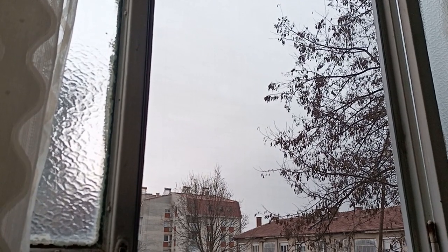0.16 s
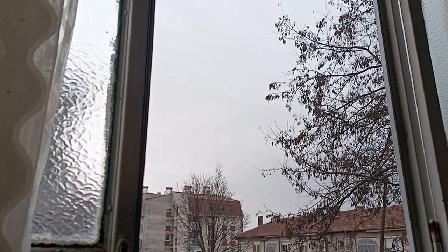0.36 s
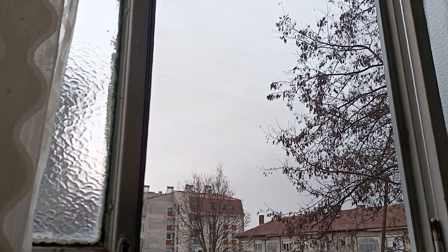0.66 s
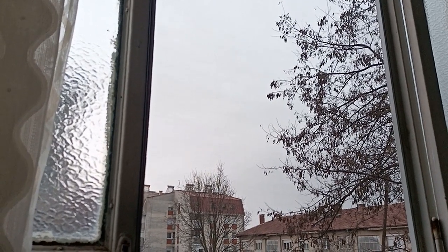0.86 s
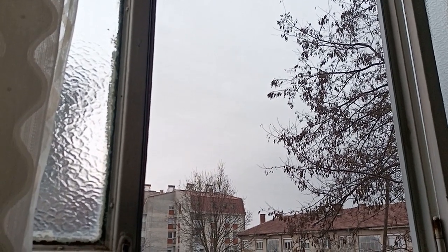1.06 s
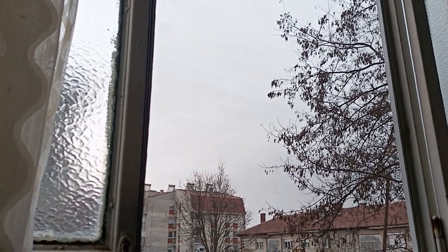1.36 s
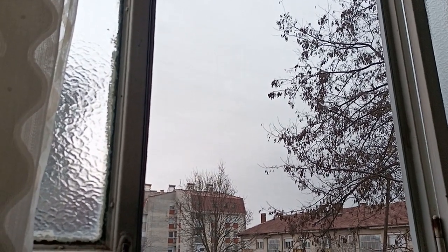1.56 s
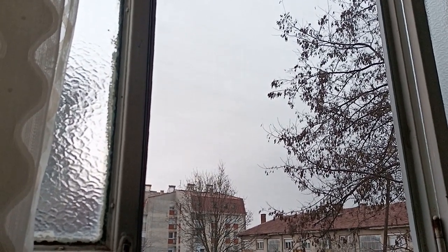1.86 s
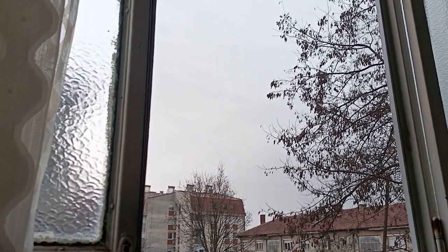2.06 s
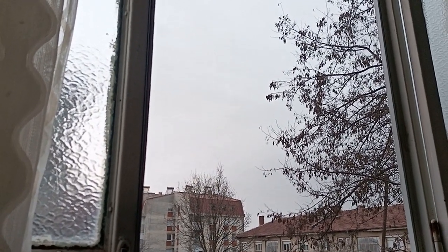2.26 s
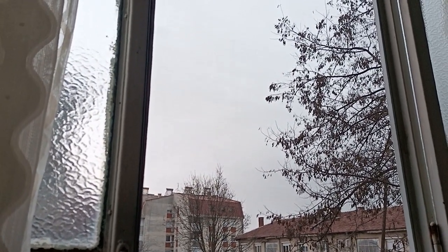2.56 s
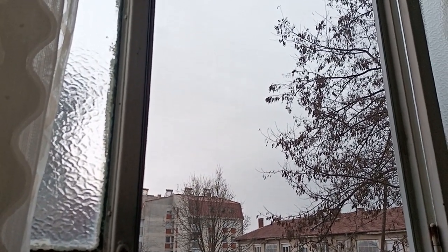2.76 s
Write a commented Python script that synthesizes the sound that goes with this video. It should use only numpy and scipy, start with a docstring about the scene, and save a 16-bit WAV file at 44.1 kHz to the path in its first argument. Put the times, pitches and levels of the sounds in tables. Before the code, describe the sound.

Distant thunder rolls in a low, uneven rumble, strongest in the first half, then fades. Light rain hisses and drops tick on the sill; one faint bird call falls late. Heard from indoors at an open window.

```python
"""Far thunder and light rain at an open window

Far thunder rolls, swells and fades in a room: dense shock clicks, dulled by distance, boom at the room's modes.
Light rain is coloured noise with a patter of small drops; larger drops tick and splash on the sill as
short noise bursts. A small bird gives one falling call, a breathy whistle under a fainter, higher one."""
import sys
import numpy as np
from scipy import signal
from scipy.fft import rfft, irfft
from scipy.io import wavfile
from scipy.ndimage import uniform_filter1d

SR = 44100
rng = np.random.default_rng(int(sys.argv[2]) if len(sys.argv) > 2 else 0)


def log_audio(samples):
    """Write samples as a 16-bit WAV file to the path given in sys.argv[1]."""
    # one column per channel
    frames = np.atleast_2d(samples).T
    # limit to full scale, then quantise
    limited = np.clip(frames, -1, 1)
    pcm = np.round(limited * 32767).astype(np.int16)
    wavfile.write(sys.argv[1], SR, pcm)


N = 127890


def amp(db):
    """Turn decibels into a linear gain."""
    return 10 ** (np.asarray(db) / 20)


def rms_one(x):
    """Bring a sound to an RMS level of 1."""
    return x / np.sqrt(np.mean(x ** 2) + 1e-20)


def in_time(rows):
    """Draw each column of a table as a curve of straight lines over its first column, the time [s]."""
    s, *columns = np.transpose(rows)
    return [np.interp(np.arange(N) / SR, s, column) for column in columns]


def coloured(x, points):
    """Shape the spectrum of x by a table of (frequency [Hz], level [dB])."""
    hz, db = np.transpose(points)
    f = np.maximum(np.fft.rfftfreq(len(x), 1 / SR), 1)
    gain_db = np.interp(np.log(f), np.log(hz), db, left=-80, right=-80)
    return irfft(rfft(x) * amp(gain_db), len(x))


def band(x, low_hz, high_hz):
    """Keep one band of a sound, with gentle edges."""
    sos = signal.butter(2, [low_hz, min(high_hz, .45 * SR)], "band", fs=SR, output="sos")
    return signal.sosfilt(sos, x)


def drift(rate_hz):
    """Smooth random wandering with RMS 1: white noise through two equal one-pole lowpasses."""
    r = np.exp(-2 * np.pi * rate_hz / SR)
    noise = rng.standard_normal(N + SR)
    return rms_one(signal.lfilter([1], [1, -2 * r, r * r], noise)[SR:])  # skip the filter's start


def clicks(per_s, spread_db):
    """Random clicks of uneven size and sign."""
    sizes = amp(spread_db * np.minimum(rng.exponential(1, N), 5)) * rng.choice([-1, 1], N)
    return sizes * (rng.random(N) < per_s / SR)


def swell(s, length_s):
    """A bell-shaped rise and fall around the time s."""
    return np.exp(-.5 * ((np.arange(N) / SR - s) / (.4 * length_s)) ** 2)


# The slow course of the roll: (time [s], level of the body 110-400 Hz [dB], boom below 110 Hz
# [dB re body], growl 400-900 Hz [dB re body], rasp 900-1190 Hz [dB re body])
ROLL = [(0, -42.5, -15.5, -4, -10.5), (.26, -43.5, -9.5, -9, -18.5), (.45, -40.5, -11, -5.5, -15.5),
        (.72, -38, -9, -6.5, -19), (1.05, -38.5, -7, -4.5, -15), (1.45, -37.5, -14.5, -10, -18.5),
        (1.75, -42, -5.5, -5.5, -18.5), (2.05, -49, -5.5, -12.5, -23), (2.4, -45, -15.5, -7, -21),
        (2.62, -55, -11, -11, -21), (2.76, -51.5, 5, -10.5, -18.5), (2.9, -48, -13, -18.5, -26)]
# Borders between the registers boom, body, growl, rasp and top: (frequency [Hz])
REGISTER_EDGES_HZ = [110, 400, 900, 1190]
# Colour left after the long path through air, shaping each register inside: (frequency [Hz], level [dB])
THUNDER_COLOUR = [(20, -30), (45, -26.5), (65, -9.5), (103, -11), (142, 0), (330, -3.5), (560, -6.5),
                  (750, -14.5), (1140, -32.5), (1230, -31), (1590, -38.5), (1800, -57), (2600, -62)]
# Modes of the room: (frequency [Hz], lift [dB])
ROOM_MODES = [(73, 16), (145, 8), (195, 4.5), (233, 8.5), (325, 9), (410, 8.5), (556, 8.5), (655, 8.5),
              (883, 9.5), (1091, 9.5)]
# Short swells and dips of the roll: (middle time [s], length [s], change of the body [dB],
# change of growl, rasp and top [dB])
SWELLS_AND_DIPS = [(0.122, 0.084, 3, 3), (0.364, 0.084, 3, 0.5), (0.587, 0.031, 5.5, 5.5),
                   (0.879, 0.11, 3.5, 5.5), (0.97, 0.044, 8.5, 6), (1.147, 0.15, 3.5, 3),
                   (1.361, 0.056, 3.5, 2), (1.521, 0.058, 7, 6), (1.668, 0.067, 9, 8),
                   (1.79, 0.021, 9.5, -3), (1.897, 0.14, 4, 3), (2.105, 0.072, 1.5, 5),
                   (2.247, 0.056, 0, -6), (2.332, 0.042, 3, 2), (2.827, 0.05, 5.5, 8)]
# Chance wavering of the noise around the lowest room mode: (peak time [s], lift [dB])
LOW_WAVER = [(1.17, 9), (1.29, 9.5), (1.7, 11), (2.26, 9.5)]
LOW_WAVER_LENGTH_S = 0.055
SHOCKS_PER_S, SHOCK_SPREAD_DB = 2500, 2  # shock waves from the bends of the lightning channel
MODE_WIDTH_HZ, MODE_WIDENS = 5.1, 0.0089  # mode width = this plus a share of its pitch
# The top, above 1190 Hz, in dB re rasp: it dies faster as the rasp sinks under TOP_AT_DB
TOP_DB, TOP_FOLLOWS, TOP_AT_DB = -10, 0.53, -55


def thunder():
    """Crowded shock waves, dulled by distance, lifted at the room modes; the registers move in level."""
    f = np.fft.rfftfreq(N, 1 / SR)
    room_db = 0
    for hz, lift_db in ROOM_MODES:
        width_hz = MODE_WIDTH_HZ + MODE_WIDENS * hz
        room_db = room_db + lift_db / (1 + (2 * (f - hz) / width_hz) ** 2)
    shocks = coloured(clicks(SHOCKS_PER_S, SHOCK_SPREAD_DB), THUNDER_COLOUR)
    heard = rfft(shocks) * amp(room_db)

    body_db, boom_db, growl_db, rasp_db = in_time(ROLL)
    low_db = sum(db * swell(s, length) for s, length, db, _ in SWELLS_AND_DIPS)
    high_db = sum(db * swell(s, length) for s, length, _, db in SWELLS_AND_DIPS)
    waver_db = sum(db * swell(s, LOW_WAVER_LENGTH_S) for s, db in LOW_WAVER)
    top_db = rasp_db + TOP_DB + TOP_FOLLOWS * (body_db + rasp_db - TOP_AT_DB)
    registers_db = [boom_db + waver_db, low_db, growl_db + high_db, rasp_db + high_db, top_db + high_db]

    # lowpass curves whose differences cut out the registers
    below = [0 * f] + [1 / (1 + (f / hz) ** 12) for hz in REGISTER_EDGES_HZ] + [0 * f + 1]
    out = 0
    for k, db in enumerate(registers_db):
        part = irfft(heard * (below[k + 1] - below[k]), N)
        # even out the register's own slow loudness, so that the curves set it
        power = uniform_filter1d(uniform_filter1d(part ** 2, size=4500), size=4500)
        out = out + amp(body_db + db) * part / np.sqrt(power + 1e-20)
    return out


# Hiss of the rain: (time [s], level within 2.2-7 kHz [dB])
RAIN = [(0, -57.5), (.14, -66.5), (.5, -70.5), (1.5, -73), (1.9, -66.5), (2.3, -69.5), (2.9, -69)]
# Tone colour of the hiss, relative: (frequency [Hz], level [dB])
RAIN_COLOUR = [(1000, -5), (1700, -1.5), (2400, -5), (5130, -10), (6240, -7.5), (8180, -20.5), (9680, -15),
               (13400, -30), (15000, -19), (15900, -26.5)]
RAIN_PATCH_DB = 1.1  # each band of the hiss wavers a little
PATTER_PER_S, PATTER_DB, PATTER_SPREAD_DB, PATTER_HZ = 45, -88, 3.5, 9600  # small far drops


def rain():
    """A patchy hiss, band by band, with a bright patter of small drops in it."""
    hiss = coloured(rng.standard_normal(N), RAIN_COLOUR)
    hiss = hiss / np.std(band(hiss, 2200, 7000))
    edges_hz = np.geomspace(900, 16500, 11)
    gust = drift(9)  # shared by all bands
    patchy = 0
    for low_hz, high_hz in zip(edges_hz, edges_hz[1:]):
        waver_db = RAIN_PATCH_DB * (.6 * gust + drift(12))
        patchy = patchy + amp(waver_db) * band(hiss, low_hz, high_hz)

    ring = np.exp(-np.arange(2000) / 77.0) * rng.standard_normal(2000)  # a noise burst of a few ms
    patter = signal.fftconvolve(clicks(PATTER_PER_S, PATTER_SPREAD_DB), ring)[:N]
    for _ in range(2):  # twice for steeper edges
        patter = band(patter, 0.85 * PATTER_HZ, 1.17 * PATTER_HZ)
    return amp(in_time(RAIN)[0]) * patchy + amp(PATTER_DB) * rms_one(patter)


SPLASH_T60_S, SPLASH_RISE_S, SPLASH_HOLD_S = 0.1, 0.0025, 0.033  # the hold is for large splashes only
SPLATTER_PER_S, SPLATTER_DB = 250, 2.5  # a splash breaks into droplets: flicker rate [Hz] and depth


def splatter(length):
    """Noise with a fast random flicker, as water breaking into droplets."""
    return rng.standard_normal(length) * amp(SPLATTER_DB * drift(SPLATTER_PER_S)[:length])


# Larger drops splash: (time [s], level of the patch before its envelope [dB], centre [Hz])
SPLASHES = [(0.013, -73.5, 3000), (0.09, -71, 3100), (0.235, -76.5, 3160), (0.324, -82, 3400),
            (0.399, -70, 3280), (0.501, -76, 2330), (0.895, -76, 3360), (1.059, -72, 3770),
            (1.245, -74, 3520), (1.848, -76, 2100), (1.98, -66, 3800), (2.719, -75, 2120)]
# Modes of the sill, ringing faintly under a splash: (frequency [Hz])
SILL_HZ = [2074, 2867, 3195, 3920, 4350, 6500]
SILL_DB = -7  # re patch, for a mode at the splash's centre, before its random share


def splashes():
    """A soft ragged patch of noise round its own centre; the sill's modes ring in new shares."""
    out, t = np.zeros(N + SR), np.arange(SR // 6) / SR
    fall = amp(-60 * np.maximum(t - SPLASH_HOLD_S, 0) / SPLASH_T60_S)
    shape = (1 - np.exp(-t / SPLASH_RISE_S)) * fall
    for s, db, hz in SPLASHES:
        x = splatter(len(t))
        patch = rms_one(band(band(x, hz / 1.35, hz * 1.35), hz / 1.35, hz * 1.35))
        sill = 0
        for mode_hz in SILL_HZ:
            # 10 dB weaker per octave away from the splash
            mode_db = SILL_DB + rng.normal(0, 4) - 10 * abs(np.log2(mode_hz / hz))
            sill = sill + amp(mode_db) * rms_one(band(x, mode_hz - 35, mode_hz + 35))
        out[int(s * SR):][:len(t)] += amp(db) * shape * (patch + sill)
    return out[:N]


# Drops tick on the sill: (time [s], nominal peak level [dB], pitch [Hz])
DROPS = [(0.0876, -49.5, 9500), (0.148, -60.5, 9400), (0.292, -56, 10500), (0.3996, -53, 9100),
         (0.5082, -54.5, 9000), (0.6474, -61, 8900), (0.6792, -54, 9240), (0.6974, -59, 9100),
         (0.9177, -59, 9600), (0.9482, -59.5, 10100), (1.015, -61.5, 9700), (1.0595, -52, 8600),
         (1.081, -58, 9900), (1.2383, -53, 8950), (1.264, -53, 7350), (1.482, -54, 10500),
         (1.5219, -60, 9350), (1.6396, -60, 7340), (1.683, -54, 9280), (1.7574, -62, 9800),
         (2.215, -62, 9900), (2.2608, -58, 9200), (2.4064, -58, 7040), (2.6065, -57, 9800),
         (2.7675, -59.5, 9200), (2.8439, -67, 9900), (2.865, -63.5, 9500)]
TICK_T60_S, TICK_TAIL_T60_S, TICK_TAIL_DB = 0.042, 0.097, 3  # the slower tail is set re the tick
TICK_WIDTH_HZ, TICK_BROAD_DB = 880, -2.5  # width of the pitched part; broad part re pitched part
SPRAY_DB = -14.5  # re the nominal peak, before its envelope


def drops():
    """Each drop: a sharp bright tick with a short ragged tail and a duller spray."""
    out, t = np.zeros(N + SR), np.arange(SR // 6) / SR
    fall = amp(-60 * t / TICK_T60_S) + amp(TICK_TAIL_DB - 60 * t / TICK_TAIL_T60_S)
    tick_shape = (1 - np.exp(-t / 0.0016)) * fall
    spray_shape = (1 - np.exp(-t / SPLASH_RISE_S)) * amp(-60 * t / SPLASH_T60_S)
    for s, db, hz in DROPS:
        x = splatter(len(t))
        broad = band(band(x, 7800, 11300), 7800, 11300)
        broad = broad + .35 * band(x, 4500, 7500) + .3 * band(x, 14000, 16000)
        pitched = rms_one(band(x, hz - TICK_WIDTH_HZ / 2, hz + TICK_WIDTH_HZ / 2))
        tick = pitched + amp(TICK_BROAD_DB) * rms_one(broad)
        spray = rms_one(band(band(x, 2500, 7500), 2500, 7500))
        # 18 dB of room for the noise peaks of the tick
        drop = amp(db - 18) * tick * tick_shape + amp(db + SPRAY_DB) * spray * spray_shape
        out[int(s * SR):][:len(t)] += drop
    return out[:N]


def whistle(hz, width_hz):
    """A tone blurred by breath: its sine and cosine parts wander at random."""
    phase = 2 * np.pi * np.cumsum(hz + np.zeros(N)) / SR
    return drift(width_hz) * np.sin(phase) + drift(width_hz) * np.cos(phase)


# The falling call: (time [s], pitch [Hz], level [dB])
BIRD = [(1.83, 5650, -81.5), (2.03, 5600, -81), (2.048, 5600, -67), (2.07, 5170, -63), (2.135, 5010, -83),
        (2.15, 4740, -73), (2.19, 4640, -73), (2.235, 4580, -83)]
# Breath blur of the soft and of the loud whistle: (drift rate [Hz])
BIRD_BREATH_HZ = [60, 330]
# A faint higher whistle: (middle time [s], length [s], pitch [Hz], level [dB])
THIN_TONE = (2, 0.9, 6698.5, -88)
BIRD_LOUD_DB = -70.5  # the call is half soft, half loud at this level


def bird():
    """One whistle that falls in steps, thin when soft and broad when loud, under a fainter high one."""
    hz, db = in_time(BIRD)
    t = np.arange(N) / SR
    on = (t > BIRD[0][0]) & (t < BIRD[-1][0])
    loud = np.clip((db - BIRD_LOUD_DB) / 4 + .5, 0, 1)
    soft_hz, loud_hz = BIRD_BREATH_HZ
    call = np.sqrt(1 - loud) * whistle(hz, soft_hz) + np.sqrt(loud) * whistle(hz, loud_hz)
    s, length, high_hz, high_db = THIN_TONE
    thin = amp(high_db) * swell(s, length) * whistle(high_hz, soft_hz)
    return on * amp(db) * call + thin


def scene():
    """All layers together, in one channel."""
    return (thunder() + rain() + splashes() + drops() + bird())[None]


CUTOFF_HZ = 15800


def record(dry):
    """The top is cut by a steep lowpass, 50 dB down from just above the cutoff."""
    return signal.sosfilt(signal.cheby2(24, 50, CUTOFF_HZ + 150, fs=SR, output="sos"), dry)


dry = scene()
out = record(dry)
log_audio(out)
```